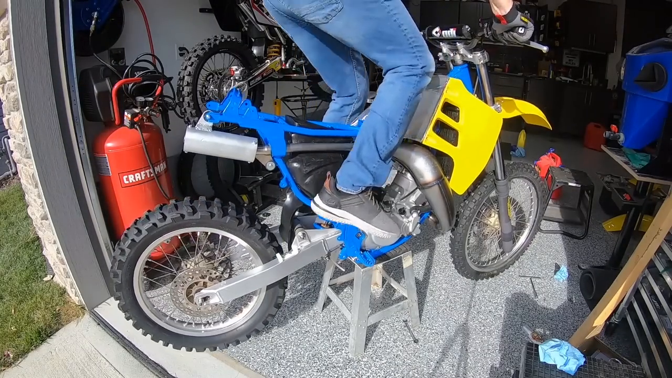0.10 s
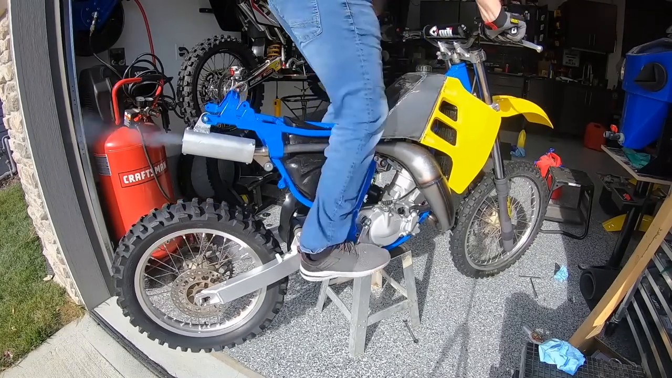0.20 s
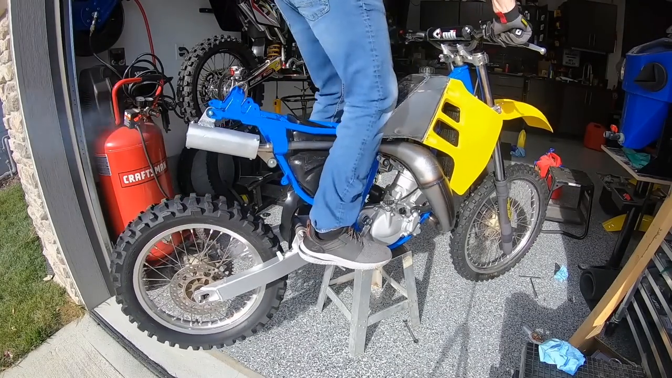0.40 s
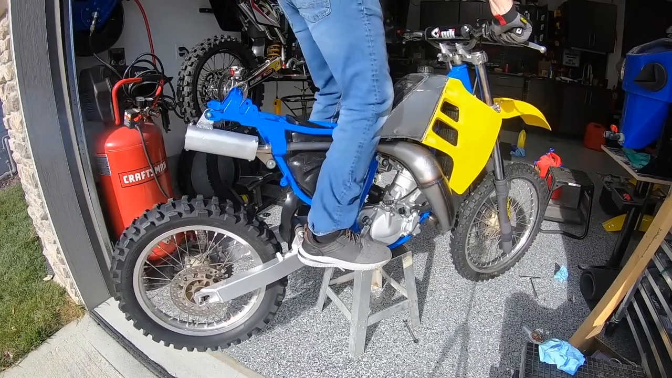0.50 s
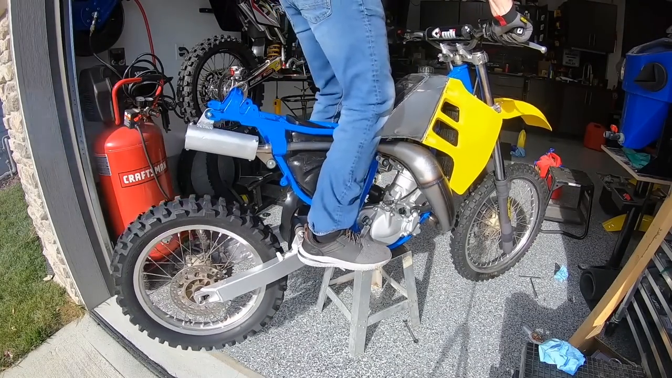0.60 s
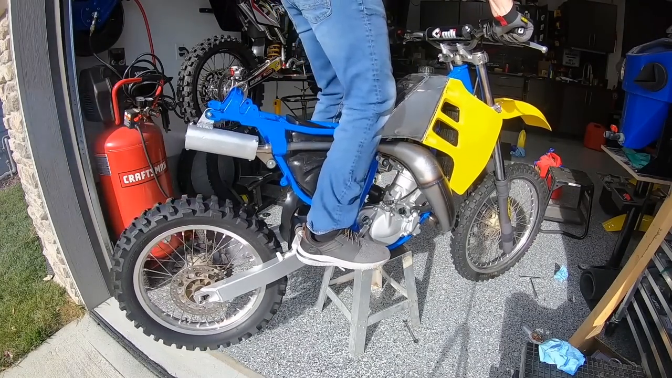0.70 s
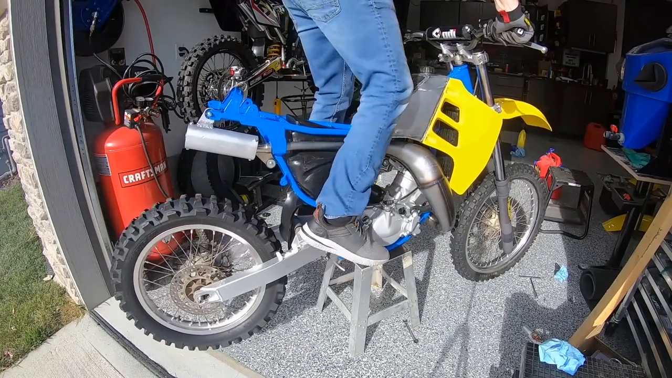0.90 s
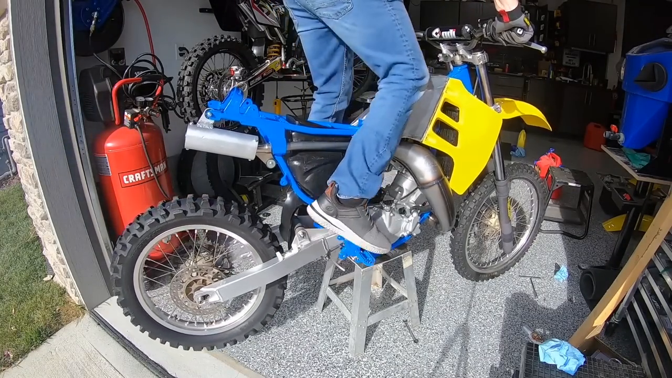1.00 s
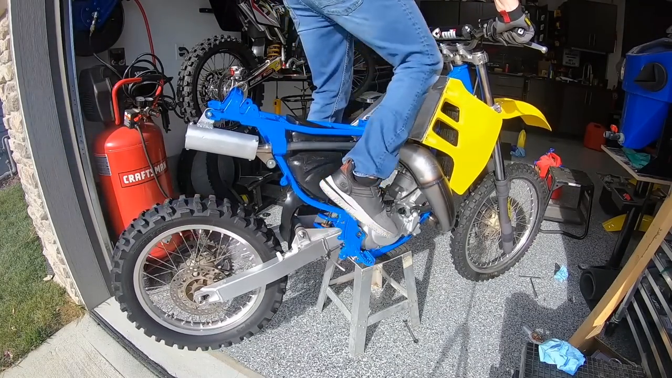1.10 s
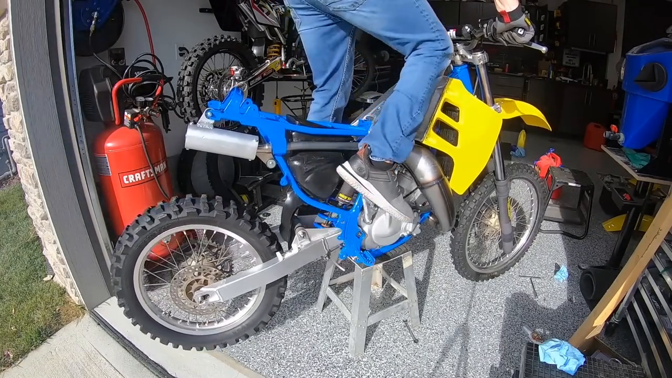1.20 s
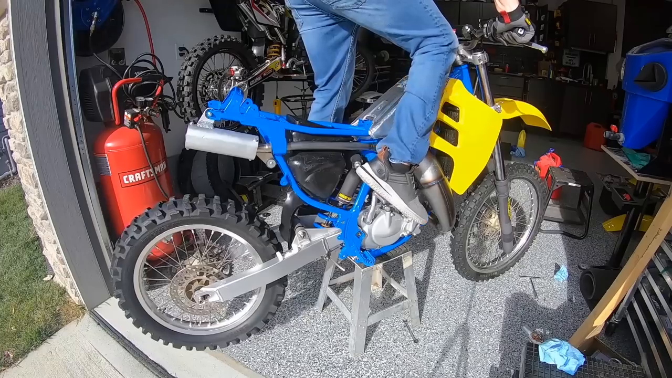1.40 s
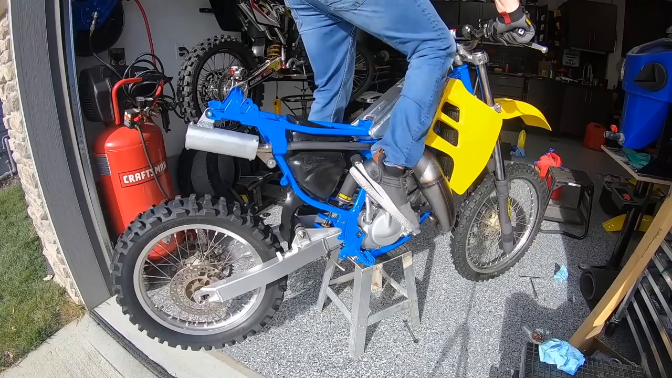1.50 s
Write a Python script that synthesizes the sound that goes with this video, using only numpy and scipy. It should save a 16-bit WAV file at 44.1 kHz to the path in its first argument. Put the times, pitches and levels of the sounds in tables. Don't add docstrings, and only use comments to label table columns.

```python
import sys
import numpy as np
from scipy import signal
from scipy.fft import rfft, irfft, next_fast_len
from scipy.io import wavfile
from scipy.ndimage import map_coordinates

SR = 44100
rng = np.random.default_rng(int(sys.argv[2]) if len(sys.argv) > 2 else 0)


def waveform_to_disk(signal):
    frames = np.transpose(np.atleast_2d(signal))
    scaled = np.clip(frames, -1, 1) * 32767
    samples = np.round(scaled).astype(np.int16)
    wavfile.write(sys.argv[1], SR, samples)


def magnitude_from_level(level_db):
    exponent = np.asarray(level_db, float) / 20
    return 10 ** exponent


N = 66150
T = np.arange(N) / SR
LUMPY_DB, CRACKLE_DB = 1.5, 2.3


def unit(x):
    return x / np.sqrt(np.mean(x ** 2) + 1e-20)


def along(points, hz):
    f, value = np.transpose(points)
    return np.interp(np.log(hz + 1), np.log(f + 1), value)


def curves(rows):
    s, *columns = np.transpose(rows)
    return [np.interp(T, s, column) for column in columns]


def wobble(rate):
    return map_coordinates(rng.standard_normal(1500), [T * rate])


def lean(db):
    return magnitude_from_level([[-db], [db]])


def filtered(x, response):
    size = next_fast_len(N + 8192)
    hz = np.fft.rfftfreq(size, 1 / SR)
    return irfft(rfft(x, size) * response(hz), size)[..., :N]


# (frequency [Hz], likeness [-1 to 1])
LIKENESS = [(40, 0.93), (130, 1), (600, 0.94), (1200, 0.33), (2500, 0.68), (5000, 0.55), (9000, -0.11)]


def rush(spectrum):
    def response(hz):
        angle = np.arccos(np.clip(along(LIKENESS, hz), -1, 1)) / 2
        return magnitude_from_level(along(spectrum, hz)) * np.array([np.cos(angle), np.sin(angle)])

    mid, side = filtered(rng.standard_normal((2, N)), response)
    return unit(np.array([mid + side, mid - side]))


def bursts(times, dbs, hold, t60):
    since = T - np.asarray(times)[:, None]
    attack = np.clip(since / 0.0025, 0, 1)
    shape = attack * magnitude_from_level(-60 * np.clip(since - hold, 0, None) / t60)
    return np.sqrt(np.sum((magnitude_from_level(np.asarray(dbs))[:, None] * shape) ** 2, axis=0))


def rings(s, modes):
    since = np.clip(T - s, 0, None)
    out = 0
    for hz, db, t60 in modes:
        decay = magnitude_from_level(db + rng.standard_normal() - 60 * since / t60)
        out = out + decay * np.sin(2 * np.pi * hz * since) * (1 - np.exp(-since / 0.0023))
    return out


def rub(s, db, hz, width_hz, t60):
    tone = np.sin(2 * np.pi * hz * T + np.array([[0], [.6]]))
    return bursts([s], [db], 0.0053, t60) * tone * wobble(width_hz)


# (time [s], level [dB])
WIND_STRENGTH = [
    (0, -33),
    (.12, -34),
    (.25, -43),
    (.4, -39.5),
    (.7, -35),
    (.87, -30),
    (.96, -46.5),
    (1.11, -30),
    (1.33, -39),
    (1.5, -27.5),
]
# (frequency [Hz], level [dB per Hz])
WIND_RUMBLE = [(5, -31), (10, 8.5), (20, 3.5), (32, -3), (60, -15), (110, -18), (150, -33.5), (260, -51),
               (440, -120)]
# (frequency [Hz], level [dB per Hz])
OPEN_AIR = [(120, -37), (230, -4), (300, -13), (900, 1), (1600, -15), (2400, -5.5), (7200, -22.5),
            (10500, -21), (15500, -41)]


def outdoors():
    wind_db, = curves(WIND_STRENGTH)
    wind = magnitude_from_level(wind_db + 1.2 * wobble(14.96)) * rush(WIND_RUMBLE)
    hum = magnitude_from_level(-46.5 + 2 * wobble(11.8)) * np.sin(2 * np.pi * 53 * T)
    microphone_hiss = magnitude_from_level(-76) * rush([(9000, -28), (12000, 0), (15300, 1), (15800, -26)])
    air = magnitude_from_level(-55.5 + LUMPY_DB * wobble(6.3)) * rush(OPEN_AIR)
    return wind + hum + microphone_hiss + air


# (time [s], gear whirr [dB], pipe breath [dB], hiss of idling gears [dB])
ENGINE_TURNING = [(0, -45, -47, -42.5), (.04, -52, -47, -44.5), (.1, -46.5, -48, -47.5),
                  (.15, -44.5, -47, -44), (.19, -33, -34, -62), (.26, -33.5, -19, -45),
                  (.36, -28.5, -24, -34.5), (.43, -28.5, -26.5, -39.5), (.49, -33, -29.5, -35),
                  (.6, -31.5, -36.5, -47), (.66, -33.5, -35.5, -44), (.76, -40, -35, -51),
                  (.9, -47.5, -46.5, -63), (1.02, -56, -47.5, -69), (1.5, -85, -50.5, -65)]
# (frequency [Hz], level [dB per Hz])
WHIRR_COLOUR = [(290, -60), (500, 2), (851, -6), (1350, -3.5), (1450, -11), (1900, -3.5), (7360, -15.5),
                (9950, -19), (15500, -75)]
# (frequency [Hz], level [dB per Hz])
BREATH_COLOUR = [(90, -8), (160, -4.5), (245, 2), (330, -2), (520, -13), (800, -49)]


def turning():
    whirr_db, breath_db, hiss_db = curves(ENGINE_TURNING)
    whirr_db = whirr_db + 1.0 * wobble(91.2) + CRACKLE_DB * wobble(500)
    whirr = magnitude_from_level(whirr_db) * rush(WHIRR_COLOUR) * lean(.8)
    hiss = magnitude_from_level(hiss_db + LUMPY_DB * wobble(57.7)) * rush(TICK_COLOUR)
    breath = magnitude_from_level(breath_db + LUMPY_DB * wobble(44.9)) * rush(BREATH_COLOUR)
    return whirr + hiss + breath


# (time [s], peak level [dB])
GEAR_TICKS = [(0.0014, -31), (0.0476, -33), (0.1205, -35), (0.734, -30), (0.7494, -32), (0.771, -32.5),
              (0.7888, -32), (0.81, -38), (0.835, -37.5), (0.8578, -33.5), (0.884, -35), (0.921, -33.5),
              (0.9585, -33.5), (1.4554, -33.5)]
# (frequency [Hz], level [dB])
TICK_COLOUR = [(1500, -10), (2800, 6), (4500, -6.5), (7000, 7), (9300, 0.5), (11000, -54), (15800, -40)]


def ticks():
    s, db = np.transpose(GEAR_TICKS)
    return bursts(s, db - 2.5, hold=.003, t60=.04) * rush(TICK_COLOUR) * lean(-1.2)


# (time [s], level [dB], pitch [Hz])
SMALL_SCUFFS = [
    (0.021, -46.5, 3040),
    (0.047, -38, 2634),
    (0.107, -36, 2400),
    (0.121, -38, 2300),
    (0.2, -27.5, 1295),
    (0.888, -35.5, 2900),
    (1.015, -40, 2274),
    (1.058, -35, 4195),
    (1.144, -34, 2223),
    (1.231, -37, 1912),
]


def scuffs():
    return sum(rub(s, db, hz, width_hz=900, t60=.07) for s, db, hz in SMALL_SCUFFS)


# (time [s], level [dB], pitch [Hz], length [ms])
COUGHS = [(0.026, -34.5, 238, 12.5), (.061, -30, 244, 6), (0.194, -23, 324, 11.5), (0.205, -6.5, 235, 19),
          (.237, -6, 263, 6.6), (.248, -1.5, 236.4, 10.9), (0.2801, -17, 247, 6.2), (0.287, -3, 241, 9),
          (0.323, -0.5, 234.6, 10), (0.345, -31, 238, 10), (.354, -11.5, 257, 6.4), (0.362, -6, 264.6, 8.7),
          (0.373, -13.5, 286, 24.7), (0.427, -21.5, 257, 4), (0.439, -16, 241, 20), (0.453, -11, 238, 9.4),
          (0.464, -15, 248, 6.3), (.482, -24.5, 213, 16), (0.504, -26, 222, 24), (0.573, -24.5, 234, 12),
          (.621, -19, 216, 9.4), (0.673, -17.5, 248, 18.8), (0.775, -15, 240, 17), (0.838, -24, 243, 7.8)]


def pipe():
    swell_share, longest_swell_s, tail_t60 = 0.8, .006, 0.023
    bend = .05
    overtone_db, undertone_db = -24.5, -19
    echo_s, echo_db = 0.02002, -12.5
    out = np.zeros(N)
    for s, db, hz, ms in COUGHS:
        since, length = T - s, ms / 1000
        swell = np.maximum(since / length / swell_share, since / longest_swell_s)
        gate = np.sin(np.pi / 2 * np.clip(swell, 0, 1)) ** 2
        gate = gate * magnitude_from_level(-60 * np.clip(since - length, 0, None) / tail_t60)
        early = bend * 0.0048 * (1 - np.exp(-np.clip(since, 0, None) / 0.0015))
        phase = 2 * np.pi * hz * (since + early)
        tone = np.sin(phase) + magnitude_from_level(overtone_db) * np.sin(2.1 * phase)
        tone = tone + magnitude_from_level(undertone_db) * np.sin(0.75 * phase)
        out += magnitude_from_level(db) * gate * tone
    late = round(echo_s * SR)
    out = signal.lfilter([1], np.r_[1, np.zeros(late - 1), -magnitude_from_level(echo_db)], out)
    return filtered(out, lambda hz: magnitude_from_level(along([(50, -38), (110, -3.5), (600, 1.0), (1100, 13)], hz)))


# (time [s], peak level [dB], body [dB], treble [dB], pitch of the singing part [Hz])
HEAVY_CLANKS = [(0.189, -23.5, 3.5, -30, 1400), (0.22, -17.5, 3.5, -18, 2737), (.232, -17.5, 1, -20, 2800),
                (0.245, -14.5, -2, -38, 2700), (0.28, -9, -1.5, -11.5, 1038),
                (.288, -18.5, -1.5, -16, 2900), (0.352, -12.5, 0, -13, 1926), (0.395, -16, -14, -8.5, 2260),
                (0.411, -19, -10, -12, 3100), (0.426, -18, -11, -9, 3600), (0.442, -14.5, 0.5, -17, 2630),
                (0.455, -13, -1.5, -8.5, 1620), (0.475, -17, -1.5, -8.5, 2920),
                (0.506, -16.5, -5, -10, 3110), (0.525, -14, -28, -13, 1028), (0.541, -16, -4, -9, 3700),
                (0.563, -14, -5, -15, 2020), (0.586, -21, -10.5, -1.5, 3060),
                (0.609, -15.5, -9, -10.5, 3030), (0.632, -17.5, -11, -6.5, 1870),
                (0.663, -22, -2, -3, 1050), (0.695, -15, -18, -12.5, 3800), (0.77, -27.5, 4.5, -20, 2180)]


def clanks():
    s, db, body, treble, _ = np.transpose(HEAVY_CLANKS)
    hold, t60 = 0.0034, 0.055
    low = bursts(s, db + body - 9.0, hold, 1.6 * t60)
    low = low * rush([(350, -4.5), (700, -1.5), (1500, -5.5), (2400, -10.5), (5000, -58)])
    mid = bursts(s, db - 14, hold, t60)
    mid = mid * rush([(1500, -79), (2500, -15.0), (3700, -14.0), (4400, -22.0), (7000, -76)])
    high = bursts(s, db + treble - 6, hold, 0.87 * t60)
    high = high * rush([(3000, -24), (5000, 4.0), (7500, 4.5), (10000, 0.5), (11500, -12.5),
                        (14600, -15.5), (15300, -48)])
    crack = bursts(s, db - 1.5, hold=0.00056, t60=0.0047)
    crack = crack * rush([(700, -30), (1500, -1), (3700, -2), (5500, -17), (10000, -23), (14800, -40)])
    singing = 0
    for time, level, _, _, hz in HEAVY_CLANKS:
        singing = singing + rub(time, level - 20, hz, width_hz=300, t60=.06)
        singing = singing + magnitude_from_level(level - 19.5) * rings(time, CASE_TONES[:1])
    rattle = (low + mid) * magnitude_from_level(CRACKLE_DB * wobble(400)) + high * magnitude_from_level(CRACKLE_DB * wobble(600))
    return crack + rattle + singing * lean(1.2)


# (time [s], pitch [Hz], level [dB], time to fall 60 dB [s])
PART_KNOCKS = [(.203, 534, -21.5, 0.16), (.203, 150, -20, 0.068), (.238, 376, -19, 0.26),
               (.28, 670, -15, 0.045), (.28, 3720, -44, 0.016), (0.28, 163, -17.5, .08),
               (0.283, 1344, -8.5, 0.013), (0.288, 991, -31, 0.23), (.29, 530, -24.5, 0.27),
               (.322, 408, -20.5, 0.055), (0.353, 169, -9, 0.055), (0.352, 1626, -23, 0.092),
               (.354, 1972, -22.5, 0.11), (.355, 521, -18.5, 0.19), (.358, 1064, -26.5, 0.29),
               (.36, 677, -29, 0.041), (0.36, 1330, -33.5, 0.4), (.37, 369, -29.5, 0.3),
               (0.441, 2570, -30, 0.13), (.448, 487.3, -21.5, 0.21), (.448, 156, -17, 0.094),
               (.39, 198, -22, 0.045), (.62, 124, -25, 0.13), (.451, 1617, -18, 0.05),
               (.453, 764, -25, 0.096), (0.462, 1510, -24, 0.095), (.462, 366, -21.5, 0.12),
               (.542, 1890, -29.5, 0.23), (.6, 1355, -25, 0.076), (.695, 3144, -41, 0.044)]


def knocks():
    return sum(rings(s, [(hz, db, t60)]) for s, hz, db, t60 in PART_KNOCKS)


# (time [s], length [s], level [dB])
PIVOT_CHIRPS = [
    (0.225, 0.016, -37),
    (0.711, 0.021, -50.5),
]
# (pitch [Hz], width [Hz], level [dB])
PIVOT_TONES = [(10450, 270, 12), (12100, 400, -18), (13300, 460, -5)]


def squeak():
    def response(f):
        return sum(magnitude_from_level(db) * (f * width / np.hypot(centre ** 2 - f * f, f * width)) ** 2
                   for centre, width, db in PIVOT_TONES)

    gate = 0
    for s, length, db in PIVOT_CHIRPS:
        gate = gate + magnitude_from_level(db) * np.sin(np.pi * np.clip((T - s) / length, 0, 1))
    return gate * unit(filtered(rng.standard_normal((2, N)), response))


# (time [s], peak level [dB], ring of the case [dB])
LEVER_CLICKS = [
    (1.059, -23, -18),
    (1.1455, -24, -5.5),
    (1.2309, -23, -6.5),
    (1.328, -22.5, -34),
]
# (frequency [Hz], level [dB])
CLICK_COLOUR = [(350, -37), (650, -5.5), (1000, -8), (2100, -9.5), (3740, -7.5), (5000, -11.5), (9500, -11),
                (10800, -37), (14000, -40)]


def ratchet():
    s, db, _ = np.transpose(LEVER_CLICKS)
    t60 = .11
    lead_in = bursts(s - .0025, db - 17.0, 0.00088, t60)
    snap = bursts(s, db - 9, 0.00058, .015)
    rattle = bursts(s, db - 15.5, .005, t60)
    grain = magnitude_from_level(CRACKLE_DB * wobble(350))
    return (lead_in + snap + rattle) * grain * rush(CLICK_COLOUR) * lean(.9)


# (pitch [Hz], level [dB], time to fall 60 dB [s])
CASE_TONES = [(3704, -1, .08), (3790, -9, .05), (4250, -9, .06), (4727, -12, .06), (9259, -8, .04)]
# (time [s], pitch [Hz], level [dB], time to fall 60 dB [s])
SPRING_RINGS = [
    (1.28, 1318, -54.5, 6),
    (1.17, 1986, -56.5, 1.6),
]


def case_ring():
    ring = sum(magnitude_from_level(db + ring_db) * rings(s, CASE_TONES) for s, db, ring_db in LEVER_CLICKS)
    for s, hz, db, t60 in SPRING_RINGS:
        fade_in = np.clip((T - s) / 0.013, 0, 1)
        ring = ring + fade_in * rings(s, [(hz, db, t60)])
    return ring * magnitude_from_level(2 * LUMPY_DB * wobble(40)) * lean(.9)


# (frequency [Hz], time to fall 60 dB [s])
GARAGE_ECHO = [(200, 0.59), (2000, 0.61), (10000, 0.19)]


def garage(x):
    hz, t, z = signal.stft(rng.standard_normal((2, SR // 2)), SR, nperseg=256)
    decay = magnitude_from_level(-60 * t / along(GARAGE_ECHO, hz)[:, None])
    tail = signal.istft(z * decay, SR, nperseg=256)[1]
    tail = tail / np.linalg.norm(tail, axis=1)[:, None]
    delayed = np.pad(x, ((0, 0), (300, 0)))
    return signal.fftconvolve(delayed, tail, axes=1)[:, :N]


def scene():
    metal = clanks() + ticks() + ratchet() + squeak() + scuffs()
    metal = metal + magnitude_from_level(-11.5) * garage(metal)
    cough = pipe() + knocks()
    cough = cough + magnitude_from_level(-17) * garage(cough[None])[0]
    return metal + case_ring() + cough + turning() + outdoors()


def band_limit(x):
    return signal.sosfilt(signal.butter(12, 15690, fs=SR, output="sos"), x)


def record(dry):
    return band_limit(dry)


dry = scene()
out = record(dry)
waveform_to_disk(out)
```